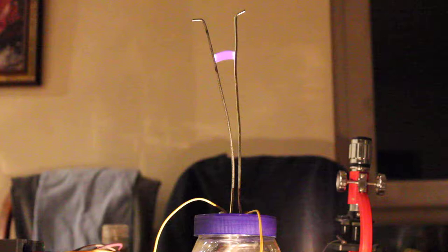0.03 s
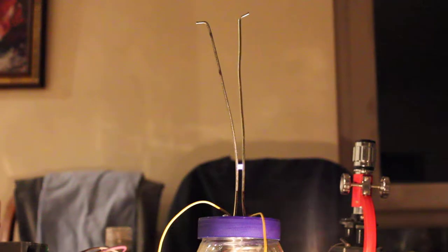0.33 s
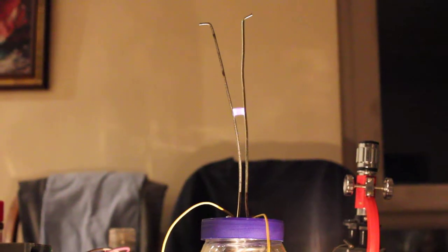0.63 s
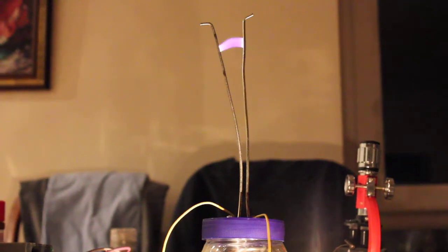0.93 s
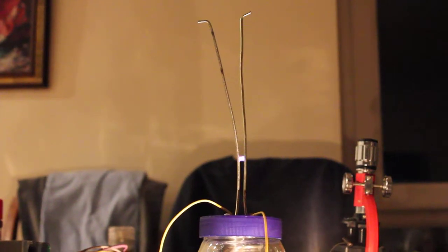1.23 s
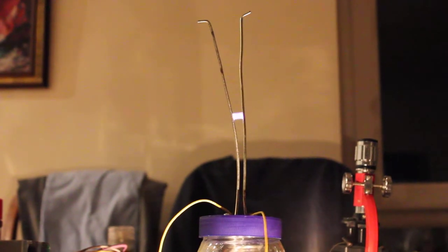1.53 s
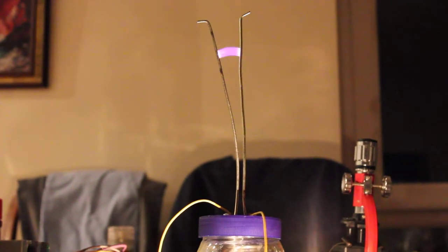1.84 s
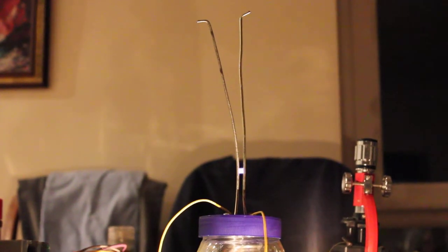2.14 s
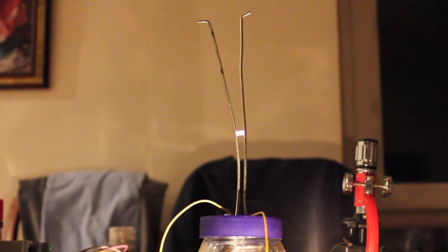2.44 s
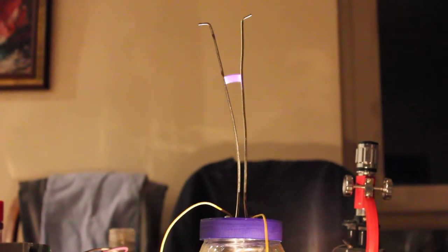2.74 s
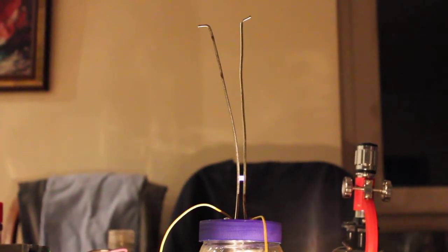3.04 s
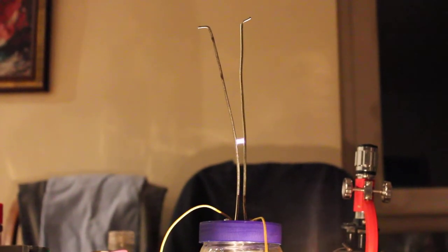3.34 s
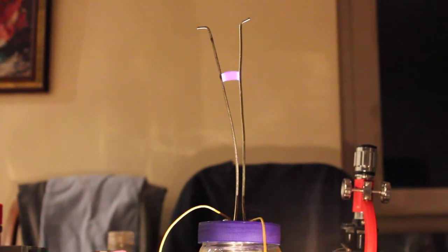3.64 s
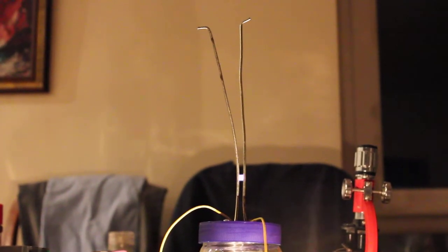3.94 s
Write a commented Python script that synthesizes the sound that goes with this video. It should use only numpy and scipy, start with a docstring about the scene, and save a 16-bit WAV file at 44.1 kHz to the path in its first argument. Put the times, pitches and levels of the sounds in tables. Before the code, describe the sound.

An electric arc sizzles up two wires, flaring into a loud rasp about once a second.

```python
"""Climbing arc in a small room

A high-voltage arc climbs two diverging wires about once a second, near a single microphone.
It sizzles with tiny sparks that grow larger and sparser as the gap widens; near the top it
whistles, flares into a loud rasp, breaks and strikes again at the bottom.
Behind it are the echoes of the walls, low room noise and a faint hum."""
import sys
import numpy as np
from scipy import signal
from scipy.fft import rfft, irfft, next_fast_len
from scipy.io import wavfile
from scipy.ndimage import map_coordinates

SR = 44100
rng = np.random.default_rng(int(sys.argv[2]) if len(sys.argv) > 2 else 0)


def store_pcm(level_fs):
    """Save levels as 16-bit WAV."""
    pcm = np.round(np.clip(level_fs, -1, 1) * 32767).astype(np.int16)
    wavfile.write(sys.argv[1], SR, np.atleast_2d(pcm).T)


N = 176400

# Room noise. Each row: frequency in Hz, relative level in dB.
AIR_SPECTRUM = [(15, -26), (30, -15), (48, -1), (65, -8), (100, -4), (180, -3), (280, 3), (420, 1),
                (590, 4), (690, -1), (790, 3), (950, -5), (1300, -2), (3000, -9), (15000, -25)]
# Hum and whine. Each row: frequency in Hz, level in dB.
HUM_TONES = [(161.5, -72), (199.2, -71), (274.5, -69.5), (580, -68.5), (790, -70), (3971, -56)]
# The room's tail. Each row: frequency in Hz, seconds to fall 60 dB.
ROOM_DECAY = [(200, .6), (2000, .75), (6000, .55), (14000, .25)]
# The climbs. Each row: strike, whistle start and break in seconds, then level offsets in dB
# for the sizzle, the flare and the difference tone.
CLIMBS = [(-.7, .01, .17, 0, 0, 0), (.172, .872, .986, .3, .3, 1), (.987, 1.82, 1.953, 0, .7, -2),
          (1.957, 2.815, 2.945, -1, -.5, 0), (2.946, 3.686, 3.81, -.6, 0, 4), (3.815, 4.5, 4.65, 1.3, 0, 0)]
# Sizzle along the wires. Each row: height from 0 to 1, relative level in dB, sparks per second.
SIZZLE_BY_HEIGHT = [(0, -24, 10000), (.13, -22.7, 10000), (.33, -18, 6000), (.5, -16.8, 3500),
                    (.75, -19, 1300), (.91, -20.8, 600), (.965, -26, 300), (1, -34, 200)]
# Last single sparks of the climbs. Each row: time in seconds, level offset in dB.
SNAPS = [(.8365, 0), (.8595, -1), (.871, -2), (1.780, 1), (1.809, -1), (1.8184, 0), (2.811, 1), (3.659, -1),
         (3.679, -1)]
# Spark colour in a short, a half-grown and a long arc, and in the flare.
# Each row: frequency in Hz, relative level in dB.
SHORT_ARC_SPECTRUM = [(60, -50), (500, -32), (1500, -28), (3000, -25), (4200, -18), (5500, -13),
                      (8500, -10.5), (9500, 0), (10500, 0), (12000, -6), (14000, -1)]
MIDDLE_ARC_SPECTRUM = [(60, -50), (500, -31), (1500, -31), (2800, -22), (3800, -18.5), (5300, -11),
                       (6300, -13), (7800, -11), (9100, 1.5), (10400, -.5), (12200, -6), (14500, -.7)]
LONG_ARC_SPECTRUM = [(60, -50), (500, -29), (1600, -27), (2400, -17), (3500, -15.7), (5000, -15.7),
                     (8700, -9), (9500, 0), (10500, 1.3), (11800, -7), (14500, -5)]
FLARE_SPECTRUM = [(60, -52), (600, -26), (1200, -26), (2100, -15.3), (5400, -11.5), (7000, -13.5),
                  (8400, -7.5), (9300, -6), (10400, 2), (11500, -4.5), (13500, -3), (15500, -9)]

AIR_DB, TAIL_DB, WALLS_DB, WALLS_S = -54.5, -4.8, -9.5, .012
WHISTLE_HZ, SPREAD_HZ, CLOSE_HZ_PER_S, WAVER_HZ = 10400, 2260, 6500, 170
CENTRE_DB, LOWER_DB, UPPER_DB, DIFFERENCE_DB = -25.5, -28, -27, -42
WHISTLE_RISE_S, WHISTLE_HOLD_S, WHISTLE_FALL_S = .05, .07, .022
FLARE_DB, FLARE_GROW_DB, FLARE_DELAY_S, FLARE_RISE_S = -13.4, 2.8, .04, .023
FLARE_SPARKS_PER_S, SPUTTER_DB, SPUTTERS_PER_S, BREAK_S = 11000, 2.1, 450, .008
SNAP_DB, HISS_DB, SPARK_SCATTER_DB, FLICKER_DB = -3, -31, 1.9, .8
START_S, TOP_HZ = .072, 15760


def amp(db):
    """Decibels to gain."""
    return 10 ** (np.asarray(db) / 20)


def unit_rms(x):
    """x scaled to rms 1."""
    return x / np.sqrt(np.mean(x ** 2) + 1e-20)


def curve_at(points, hz):
    """(Hz, value) points read on a log frequency axis."""
    freqs, values = np.transpose(points)
    return np.interp(np.log(hz + 1), np.log(freqs + 1), values)


def wobble(rate, hop=16):
    """A smooth random curve, rate knots a second."""
    steps = np.arange(0, N + hop, hop)
    knots = rng.standard_normal(N // 64)
    return np.interp(np.arange(N), steps, map_coordinates(knots, [steps * rate / SR], mode="wrap"))


def coloured(x, spectrum, size=2048):
    """x through a minimum-phase filter of energy 1 below TOP_HZ."""
    hz = np.fft.rfftfreq(size, 1 / SR)
    gain = amp(curve_at(spectrum, hz))
    gain /= np.sqrt(np.mean(gain ** 2 * (hz < TOP_HZ)))
    cepstrum = irfft(np.log(gain))
    cepstrum[1:size // 2] *= 2
    cepstrum[size // 2 + 1:] = 0
    return signal.fftconvolve(x, irfft(np.exp(rfft(cepstrum))))[:N]


def background(t):
    """Room tone behind the arc: low noise with a faint unsteady hum and whine."""
    hum = 0
    for hz, db in HUM_TONES:
        tone = np.sin(2 * np.pi * hz * t + .8 * wobble(5))
        hum += amp(db) * unit_rms(tone * amp(3 * wobble(3)))
    return hum + amp(AIR_DB) * coloured(rng.standard_normal(N), AIR_SPECTRUM)


def echoes(x, count=8):
    """A few reflections off the near walls and a tail that dies sooner in the treble."""
    hz, t, noise = signal.stft(rng.standard_normal(SR // 2), SR, nperseg=256)
    decay = amp(-60 * t / curve_at(ROOM_DECAY, hz)[:, None])
    tail = signal.istft(noise * decay, SR, nperseg=256)[1]
    tail *= np.minimum(np.arange(len(tail)) / (WALLS_S * SR), 1)
    response = amp(TAIL_DB) * tail / np.linalg.norm(tail)
    delays = (WALLS_S * SR * rng.uniform(.15, 1, count)).astype(int)
    response[delays] += amp(WALLS_DB) * rng.choice([-1, 1], count) / np.sqrt(count)
    return signal.fftconvolve(x, response)[:N]


def room(direct, height):
    """The echoes reaching the microphone change as the arc moves up the wires."""
    shares = [np.interp(height, [.2, .6, 1], corner) for corner in np.eye(3)]
    reflected = sum(echoes(direct * np.sqrt(share)) for share in shares)
    return (direct + reflected) / np.sqrt(1 + amp(TAIL_DB) ** 2 + amp(WALLS_DB) ** 2)


def latest_climb(t, column):
    """Per sample, the last climb whose time in that column has passed, or else the first climb."""
    rows = np.array(CLIMBS)
    index = np.searchsorted(rows[:, column], t, "right") - 1
    return rows[np.maximum(index, 0)].T


def until(t, end):
    """1 up to the end, then a quick fade."""
    return np.exp(-np.clip((t - end) / BREAK_S, 0, 20))


def climb(t):
    """The arc rises steadily until it whistles: its height (0-1) and the gain of its sizzle."""
    strike_s, whistle_s, _, sizzle_db, _, _ = latest_climb(t, column=0)
    height = np.minimum((t - strike_s) / (whistle_s - strike_s), 1)
    return height, amp(sizzle_db) * until(t, whistle_s)


def sparks(rate):
    """Irregular impulses, rate a second, of mean power 1: the sparser, the larger."""
    turns = np.cumsum(np.clip(rate / SR, 0, 1))
    due = np.arange(N) + rng.random(N)  # each fires at a random moment of its turn
    sizes = unit_rms(amp(SPARK_SCATTER_DB * rng.standard_normal(N))) * rng.choice([-1, 1], N)
    onsets = np.searchsorted(turns, due[due < turns[-1]])
    return np.bincount(onsets, sizes[:len(onsets)], N) * np.sqrt(SR / rate)


def whistle(t):
    """Near the top the arc oscillates: a tone, two side tones closing in, and their difference tone."""
    _, whistle_s, _, _, _, offset_db = latest_climb(t, column=1)
    age = np.maximum(t - whistle_s, 0)
    rise = np.sqrt(np.minimum(age / WHISTLE_RISE_S, 1))
    swell = rise * np.exp(-np.maximum(age - WHISTLE_HOLD_S, 0) / WHISTLE_FALL_S)
    centre = 2 * np.pi * np.cumsum(WHISTLE_HZ + 20 * wobble(150)) / SR
    beat = 2 * np.pi * np.cumsum(SPREAD_HZ - CLOSE_HZ_PER_S * age + WAVER_HZ * wobble(400)) / SR
    tones = [(centre, amp(CENTRE_DB)), (centre - beat, amp(LOWER_DB)), (centre + beat, amp(UPPER_DB)),
             (beat, amp(DIFFERENCE_DB + offset_db) * swell ** 2)]
    return swell * sum(gain * unit_rms(np.sin(phase) * amp(2.5 * wobble(200))) for phase, gain in tones)


def flare(t):
    """The overstretched arc sputters ever louder until it breaks."""
    _, whistle_s, break_s, _, offset_db, _ = latest_climb(t, column=1)
    stretch = np.clip((t - break_s) / (break_s - whistle_s), -1, 0)
    rise = .5 + .5 * np.tanh((t - whistle_s - FLARE_DELAY_S) / (2 * FLARE_RISE_S))
    swell = amp(FLARE_DB + offset_db + FLARE_GROW_DB * stretch) * rise * until(t, break_s)
    train = sparks(np.full(N, FLARE_SPARKS_PER_S))
    sputter = unit_rms(amp(SPUTTER_DB * wobble(SPUTTERS_PER_S)))
    return coloured(swell * train * sputter, FLARE_SPECTRUM)


def sizzle(height, gain):
    """The gap widens with height, which sets the level, rate and colour of the sparks."""
    heights, levels, rates = np.transpose(SIZZLE_BY_HEIGHT)
    train = sparks(np.interp(height, heights, rates))
    train *= gain * amp(np.interp(height, heights, levels) + FLICKER_DB * wobble(35))
    train += amp(HISS_DB) * rng.standard_normal(N)  # smooth hiss of the burning channel
    for time_s, db in SNAPS:
        train[round(time_s * SR)] += amp(SNAP_DB + db)
    spectra = SHORT_ARC_SPECTRUM, MIDDLE_ARC_SPECTRUM, LONG_ARC_SPECTRUM
    shares = [np.interp(height, [.24, .54, .82], corner) for corner in np.eye(3)]  # crossfades
    return sum(coloured(train * share, spectrum) for share, spectrum in zip(shares, spectra))


def scene():
    """The arc and its room at one microphone, the same in both channels."""
    t = np.arange(N) / SR
    height, gain = climb(t)
    arc = sizzle(height, gain) + flare(t) + whistle(t)
    mono = room(arc, height) + background(t)
    return np.array([mono, mono])


def record(dry):
    """The sound opens abruptly after a moment of silence; the treble is cut off at TOP_HZ."""
    size = next_fast_len(N + SR // 2)
    opened = dry * (np.arange(N) >= START_S * SR)
    lowpass = np.clip((TOP_HZ + 100 - np.fft.rfftfreq(size, 1 / SR)) / 200, 0, 1)
    return irfft(rfft(opened, size) * lowpass, size)[:, :N]


dry = scene()
out = record(dry)
store_pcm(out)
```